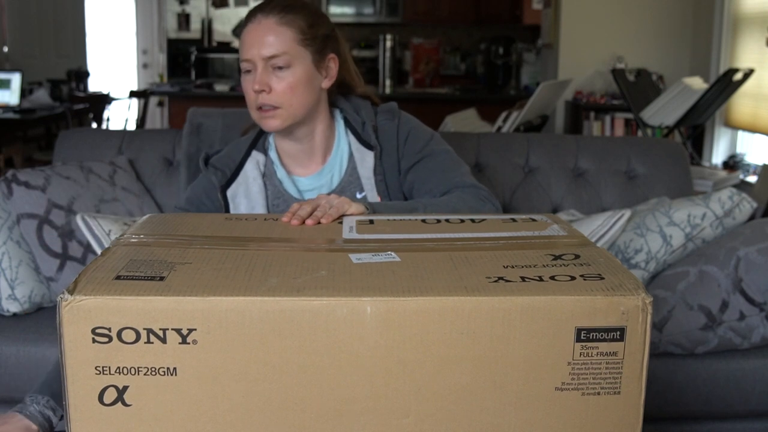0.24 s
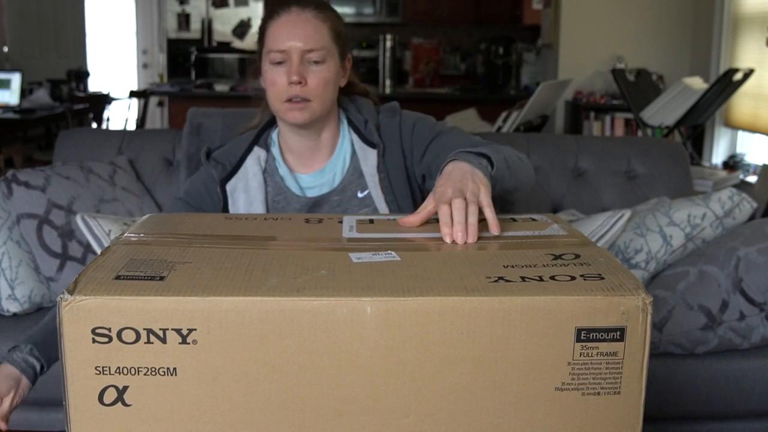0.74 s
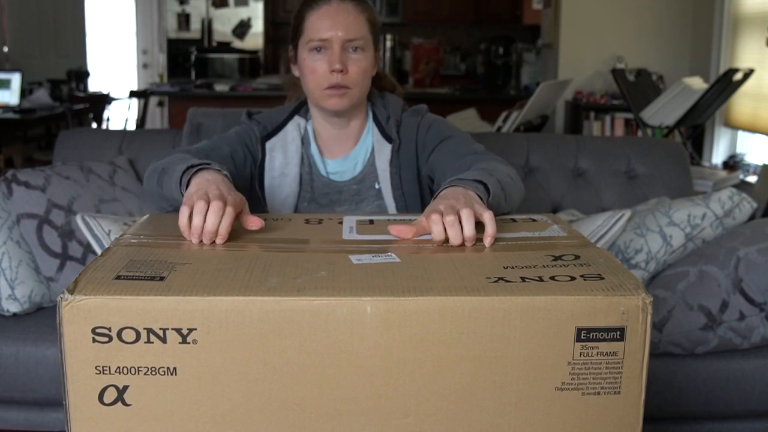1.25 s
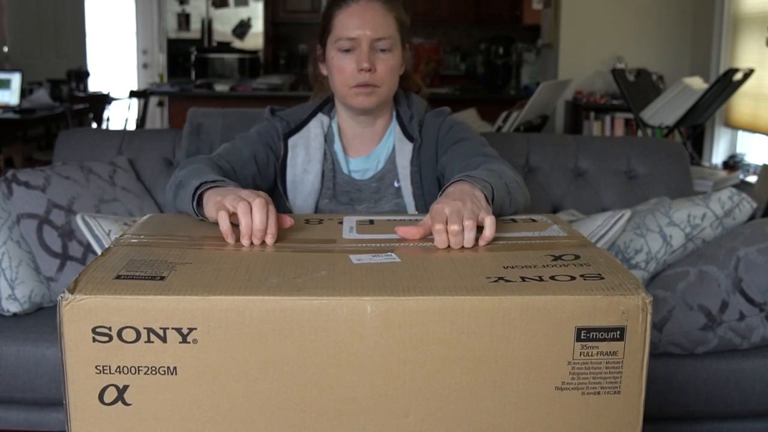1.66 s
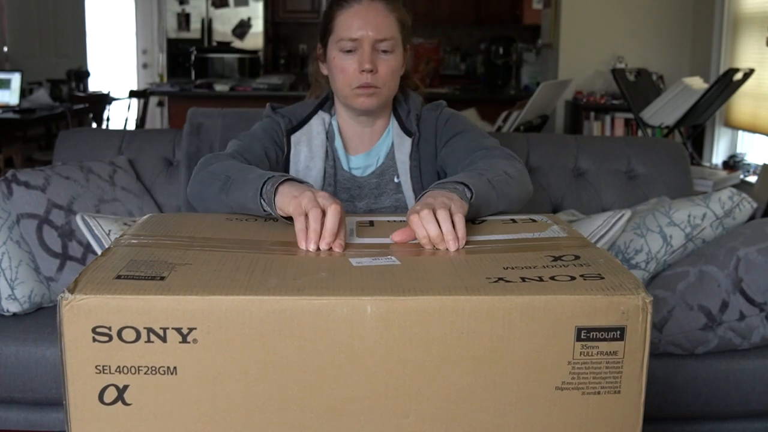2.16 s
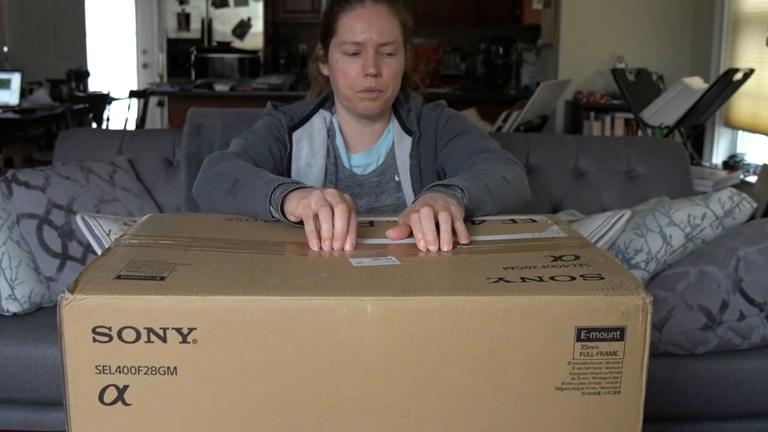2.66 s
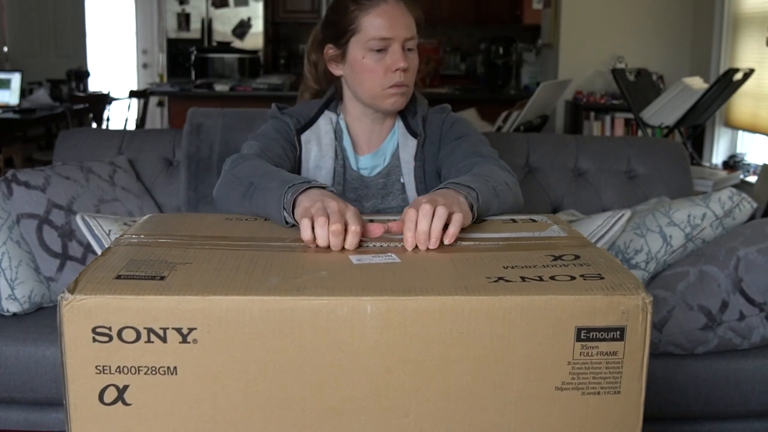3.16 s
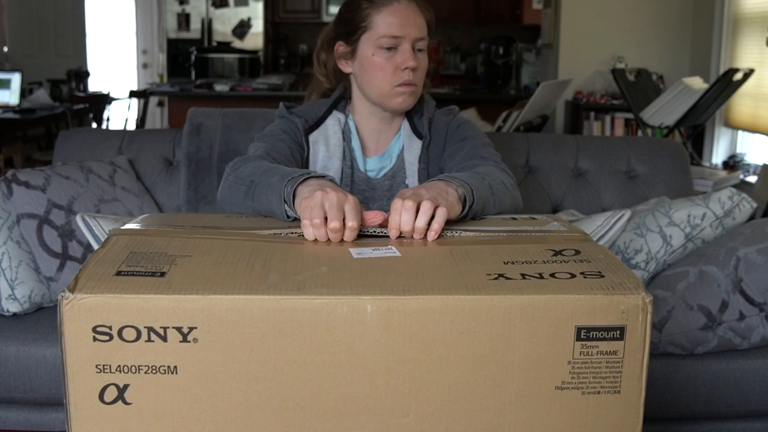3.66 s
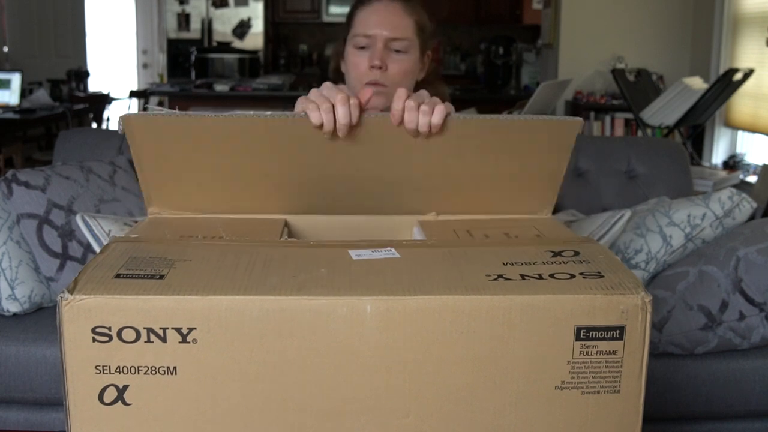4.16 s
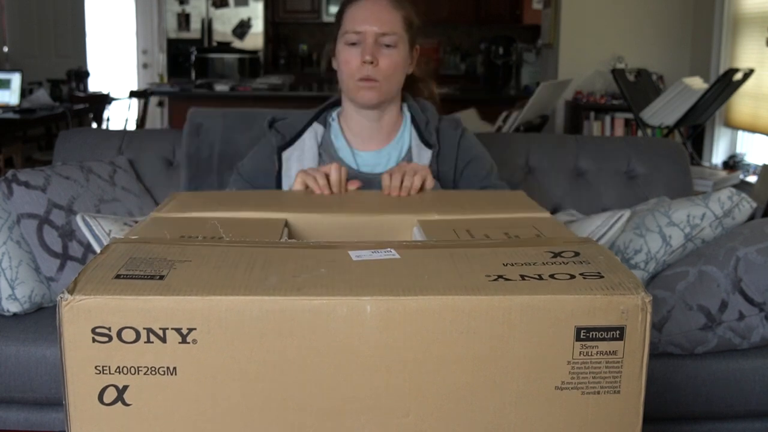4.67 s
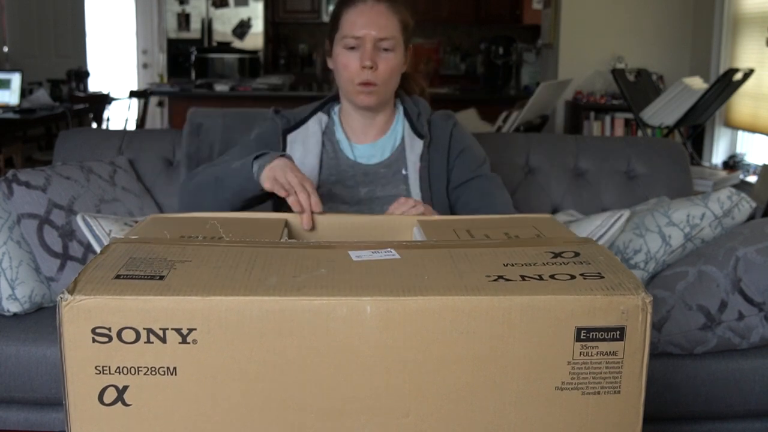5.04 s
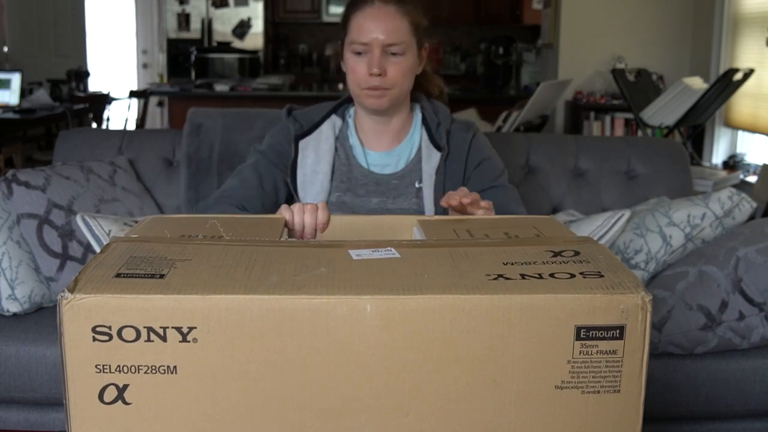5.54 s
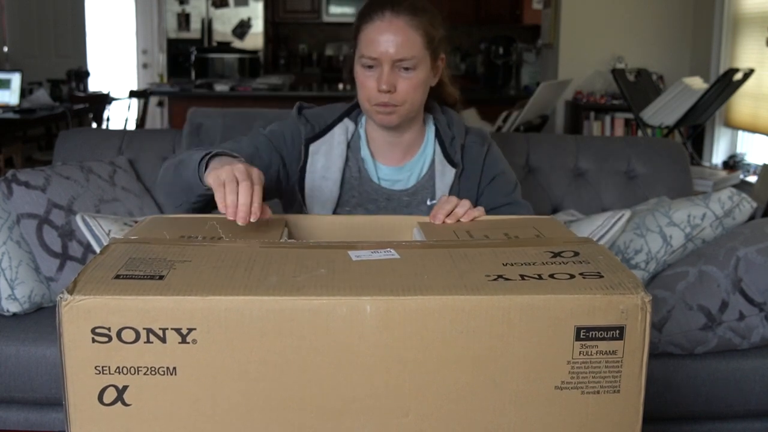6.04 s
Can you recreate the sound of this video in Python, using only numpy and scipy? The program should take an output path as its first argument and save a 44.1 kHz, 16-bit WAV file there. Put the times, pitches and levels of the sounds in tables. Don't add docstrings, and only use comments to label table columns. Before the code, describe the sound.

After a small hard tool clicks down, taped cardboard creaks and pops, rips loudly open, and settles into faint scuffs and rubbing.

```python
import sys
import numpy as np
from scipy import signal
from scipy.fft import rfft, irfft
from scipy.io import wavfile

SR = 44100
rng = np.random.default_rng(int(sys.argv[2]) if len(sys.argv) > 2 else 0)


def unload_wav(signal):
    wavfile.write(
        sys.argv[1],
        SR,
        np.round(np.clip(np.atleast_2d(signal).T, -1, 1) * 32767).astype(np.int16),
    )


def volts_from_decibels(level):
    exponent = np.asarray(level, float) / 20
    return 10 ** exponent


N = 278138

# (frequency [Hz], level [dB], T60 [s])
BOX_SOFT = [(192, -0.5, 0.091), (196, -8, 0.022), (234.3, -2.5, 0.14), (294, -14, 0.042), (301.7, 2, 0.072),
            (342.8, 0.5, 0.079), (396, -1.5, 0.063), (454, -1.5, 0.027)]
# (frequency [Hz], level [dB], T60 [s])
BOX_HARD = [(485, 1, 0.055), (576.4, 5, 0.036), (663, -3.5, 0.054), (728, -2.5, 0.091), (852, 4.5, 0.023),
            (957, -2.5, 0.062), (1124, -5, 0.025), (1420, -4, 0.028), (1609, -8.5, 0.06)]
# (time [s], peak [dB], hard part re peak [dB])
PRY_THUMPS = [(0.5614, -29, 11.5), (0.6629, -25, 3), (0.6676, -18.5, 7), (0.6858, -22, 11), (0.707, -32, 6),
              (0.7802, -40, 11), (0.85, -33, -1.5), (1.0001, -35.5, -9), (1.023, -35.5, -5),
              (1.101, -34.5, -3), (1.1592, -25.5, -8), (1.1804, -30.5, -26), (1.2486, -34, -2),
              (1.3374, -33, 1.5), (1.3453, -24, -5.5), (1.426, -27, -40), (1.5786, -31, -3.5),
              (2.916, -41, 3.5), (1.6588, -25, -1), (1.7337, -25, -5), (1.8377, -15.5, 2),
              (1.8864, -32, -2), (1.951, -24.5, -1.5), (2.0477, -33, -5), (2.1798, -26.5, -6),
              (2.36, -19, 1.5), (2.6284, -31, -5), (2.664, -22.5, -4), (2.685, -19.5, -8), (2.726, -33, 5),
              (0.958, -40.5, -12)]
# (time [s], peak [dB], hard part re peak [dB])
PULL_THUMPS = [(3.037, -28, -2), (3.053, -30.5, 4.5), (3.0951, -22, -3.5), (3.186, -21, -9),
               (3.3482, -37, 3.5), (3.4742, -35, 8.5), (3.555, -35, 1.5), (3.6399, -31.5, 0.5),
               (3.6866, -30.5, 13), (3.7384, -27.5, 2), (3.7547, -37, 11.5), (3.814, -13.5, -3),
               (3.8697, -12, -1), (3.8923, -23.5, 6), (3.937, -17.5, -2.5), (4.593, -43, -32),
               (4.0721, -5, -2), (4.0887, -11.5, 0.5), (4.114, -14.5, -4.5), (4.1285, -34, -4),
               (4.184, -45, 17), (4.8858, -34.5, -7), (5.6983, -35.5, -11), (5.716, -43, -10),
               (5.846, -42, -1), (6.007, -41.5, -7), (4.0625, -22, 3), (6.258, -40, -3), (5.821, -50, 2),
               (5.914, -48.5, 2), (5.934, -47.5, 0), (6.069, -43, -3.5), (6.1, -42, -3), (5.012, -43, 2),
               (4.075, -16, -3)]
# (start [s], end [s])
PEELING_S = (1.08, 4.3)


def at_hz(points, hz):
    point_hz, value = np.array(points).T
    return np.interp(np.log(hz + 1), np.log(point_hz), value)


def rms_one(x):
    return x / np.sqrt(np.mean(x ** 2) + 1e-20)


def band(x, low_hz, high_hz):
    edges_hz = [low_hz, min(high_hz, 0.45 * SR)]
    return signal.sosfilt(signal.butter(2, edges_hz, "band", fs=SR, output="sos"), x + 1e-18)


def drift(rate_hz):
    step = 40
    settle = 2000
    r = np.exp(-2 * np.pi * rate_hz * step / SR)
    white = rng.standard_normal(N // step + settle + 2)
    slow = signal.lfilter([1], [1, -2 * r, r * r], white)[settle:]
    return np.interp(np.arange(N) / step, np.arange(len(slow)), rms_one(slow))


def coloured(spectrum):
    hz = np.fft.rfftfreq(N, 1 / SR)
    inside = (hz > spectrum[0][0]) & (hz < spectrum[-1][0])
    white = rfft(rng.standard_normal(N))
    return rms_one(irfft(white * volts_from_decibels(at_hz(spectrum, hz)) * inside, N))


def bursts(times, level_db, length_s):
    size = 160
    decay = np.exp(-np.arange(size) / (length_s * SR))
    shape = rng.standard_normal((len(times), size)) * decay
    shape /= np.sqrt(np.sum(shape ** 2, axis=1, keepdims=True))
    out = np.zeros(N + size)
    at = (np.asarray(times) * SR).astype(int)[:, None] + np.arange(size)
    np.add.at(out, at, shape * volts_from_decibels(level_db)[:, None])
    return out[:N]


def struck(times, level_db, modes, spread_db, contact_s):
    out = np.zeros(N)
    chance = rng.standard_normal((len(times), len(modes), 3))
    for k, (hz, mode_db, t60) in enumerate(modes):
        strength, sign, delay = chance[:, k].T
        at = ((times + contact_s * np.abs(delay)) * SR).astype(int)
        blow = volts_from_decibels(level_db + mode_db + spread_db * np.clip(strength, -2, 1))
        force = np.full(N, 1e-18)
        np.add.at(force, at, blow * np.sign(sign + 1))
        r, w = volts_from_decibels(-60 / (t60 * SR)), 2 * np.pi * hz / SR
        out += signal.lfilter([0, np.sin(w)], [1, -2 * r * np.cos(w), r * r], force)
    return out


def background():
    # (frequency [Hz], density [dB per Hz])
    floor = [(30, -7.5), (60, 4.5), (110, -8.5), (220, 1.5), (500, -16), (1000, -29), (2500, -26),
             (8000, -37.5), (16000, -49)]
    # (time [s], level [dB])
    sway_level = [(0, -59), (1, -59), (1.5, -50), (2.3, -52.5), (2.9, -44), (3.5, -59), (4.3, -48.5),
                  (4.8, -60.5), (5.25, -43.5), (5.6, -43.5), (5.95, -54.5), (6.12, -44), (6.31, -50)]
    t = np.arange(N) / SR
    drone_hz, drone_db, drone_end_s = 393, -64, 0.64
    drone = volts_from_decibels(drone_db + 1.0 * drift(7.3)) * np.sin(2 * np.pi * drone_hz * t)
    drone *= np.clip((drone_end_s - t) / 0.044, 0, 1)
    sway_s, sway_db = np.transpose(sway_level)
    sway_hz = 18.5 + 1.2 * drift(2)
    sway = volts_from_decibels(np.interp(t, sway_s, sway_db) - 1.0) * np.sin(2 * np.pi * np.cumsum(sway_hz) / SR)
    return volts_from_decibels(-62) * coloured(floor) + drone + sway


def tool():
    # (time [s], peak [dB], low ring re peak [dB])
    taps = [
        (0.131, -64, 16),
        (0.1761, -34.5, -1),
        (0.182, -49, 0),
        (0.189, -50, -10),
        (.209, -46.5, 14),
        (0.295, -58, -3),
        (0.328, -56, 11),
        (0.382, -27.5, -9),
        (0.428, -52, -3),
        (.474, -60, 7),
    ]
    # (frequency [Hz], level [dB], T60 [s])
    high_modes = [(3400, 5, 0.0071), (3930, 6.5, 0.011), (4800, 3, 0.0094), (5430, 6.5, 0.0062),
                  (8060, 14, 0.0017), (9500, 14, 0.003), (11500, -19, 0.0016), (13200, 11.5, 0.0009)]
    # (frequency [Hz], level [dB], T60 [s])
    low_modes = [(740, -10.5, 0.031), (1800, -7, .015), (1940, -3, 0.026)]
    s, peak_db, low_db = np.transpose(taps)
    high = struck(s, peak_db - 11.5, high_modes, spread_db=8.5, contact_s=0.00054)
    low = struck(s, peak_db + low_db - 9.0, low_modes, spread_db=2.5, contact_s=0.000674)
    click = band(bursts(s, peak_db, length_s=0.0008), 2800, 13000)
    slide_start_s, slide_length_s, slide_db = 0.26, 0.048, -67.5
    slide_hz, rise_hz_per_s = 1810, 6000
    t = np.arange(N) / SR - slide_start_s
    swell = np.clip(np.minimum(t, slide_length_s - t) / 0.015, 0, 1) * volts_from_decibels(slide_db + 4 * drift(60))
    pitch_hz = slide_hz + rise_hz_per_s * t + 50 * drift(80)
    slide = swell * np.sin(2 * np.pi * np.cumsum(pitch_hz) / SR)
    return high + low + slide + click


def settling(times, level_db, fall_db_per_s):
    rise_s = 0.0006
    power = np.full(N, 1e-18)
    np.add.at(power, (times * SR).astype(int), volts_from_decibels(2 * level_db))
    rise = np.exp(-1 / (rise_s * SR))
    falling = signal.lfilter([1], [1, -volts_from_decibels(-2 * fall_db_per_s / SR)], power)
    return signal.lfilter([1 - rise], [1, -rise], falling)


def handling(snap_s, snap_db, snap_dull_db):
    # (start [s], hold [s], hiss [dB], weight on the board re hiss [dB])
    strokes = [(0.212, 0.05, -63, -13), (0.398, 0.068, -60.5, 1), (0.521, 0.0083, -54, -2),
               (0.785, 0.013, -50.5, 17.5), (0.993, 0.022, -56, -20), (1.127, 0.074, -63, 23.5),
               (1.23, 0.13, -60.5, 18.5), (1.599, 0.0089, -58.5, 18), (1.707, 0.046, -67, 24),
               (1.8, 0.027, -43.5, 11), (1.928, 0.071, -53.5, 11), (2.057, 0.11, -56, 11),
               (2.19, 0.006, -53, 16.5), (2.55, 0.12, -69, 21.5), (2.999, 0.037, -50, 8.5),
               (3.238, 0.074, -56, 16.5), (3.426, 0.15, -53, 11.5), (3.7, 0.25, -50.5, 17),
               (4.222, 0.15, -56.5, -3), (4.415, 0.35, -54.5, 2.5), (4.808, 0.067, -63, 14),
               (4.63, 0.064, -50.5, 0.5), (4.885, 0.1, -49, 6.5), (5.031, 0.075, -48.5, 4),
               (5.153, 0.11, -53.5, -1.5), (5.31, 0.13, -59, 3.5), (5.634, 0.16, -60, 13.5),
               (5.73, 0.21, -58, 2), (6.034, 0.043, -65, 16.5), (6.256, 0.047, -56, 7.5)]
    rise_db_per_s, fall_db_per_s = 398.5, 164.5
    rest_bright_db, rest_dull_db, rest_creak_db = -95.5, -80, -58
    grip_db = np.array([[-63], [-76]])
    t = np.arange(N) / SR
    jerk_s, jerk_db, hard_db = np.transpose(PRY_THUMPS + PULL_THUMPS)
    bright = volts_from_decibels(2 * rest_bright_db) + settling(snap_s, snap_db - 38, 157)
    dull = volts_from_decibels(2 * rest_dull_db) + settling(snap_s, snap_db + 0.81 * snap_dull_db - 22, 152)
    creak = volts_from_decibels(2 * rest_creak_db) + settling(jerk_s, jerk_db + 0.41 * hard_db - 14.5, 135.5)
    power = np.array([bright, dull, creak])
    power[:2] += volts_from_decibels(2 * grip_db) * (t > PEELING_S[0]) * (t < PEELING_S[1])
    for s, hold, db, weight_db in strokes:
        before_db = np.maximum(rise_db_per_s * (s - t), 0)
        after_db = np.maximum(fall_db_per_s * (t - s - hold), 0)
        stroke_db = db - np.minimum(before_db + after_db, 100)
        balance_db = np.array([[0], [-3 + 0.036 * weight_db], [weight_db]])
        power += volts_from_decibels(2 * stroke_db) * volts_from_decibels(2 * balance_db)
    return 10 * np.log10(power)


def rubbing(bright_db, dull_db, creak_db):
    # (frequency [Hz], density [dB per Hz])
    bright_spectrum = [(4800, -8), (6500, -1), (8500, -4), (11000, 0), (14000, -3), (16200, -5)]
    dull_spectrum = [(800, -5.5), (1100, 3), (1600, 0), (2500, -5.5), (4300, -3), (6200, -5),
                     (10000, -12.5)]
    creak_spectrum = [(90, -9), (230, 0), (420, -3), (800, -4), (1500, -20.5), (3500, -32)]
    flicker_db = 1.8 * drift(20)
    bright = volts_from_decibels(bright_db - 6.0 + flicker_db) * coloured(bright_spectrum)
    dull = volts_from_decibels(dull_db - 1.0 + flicker_db + 1.0 * drift(24)) * coloured(dull_spectrum)
    creak = volts_from_decibels(creak_db - 10.0 + 3.98 * drift(18)) * coloured(creak_spectrum)
    return bright + dull + creak


def rattle(creak_db):
    catches_per_s = 90
    s = np.sort(rng.uniform(0, N / SR - 0.02, int(catches_per_s * N / SR)))
    uneven_db = 4 * np.minimum(rng.exponential(1, len(s)), 1.8)
    level_db = creak_db[(s * SR).astype(int)] - 9.5 + uneven_db
    soft = struck(s, level_db, BOX_SOFT, spread_db=4.0, contact_s=0.002)
    hard = struck(s, level_db - 7.5, BOX_HARD, spread_db=6.5, contact_s=0.002)
    return band(soft + hard, 87, 3000)


def thumps():
    # (time [s], peak [dB])
    shifts = [(0.663, -48), (1.017, -47), (1.157, -48), (1.248, -48), (1.349, -49), (1.42, -53),
              (1.728, -56), (1.83, -39), (2.072, -44.5), (2.357, -51), (2.623, -58), (2.725, -45),
              (3.18, -55), (3.705, -57), (3.809, -31), (3.873, -38), (4.086, -24), (4.63, -52),
              (5.138, -53), (5.626, -45)]
    # (frequency [Hz], level [dB], T60 [s])
    boom_modes = [(62.1, 0.0021, 0.097), (75, 0, 0.16)]
    s, peak_db, hard_db = np.transpose(PRY_THUMPS + PULL_THUMPS)
    soft = band(struck(s, peak_db - 7.0, BOX_SOFT, spread_db=4.0, contact_s=0.00075), 200, 1500)
    hard = struck(s, peak_db + hard_db - 9.5, BOX_HARD, spread_db=4.5, contact_s=0.001383)
    slap = band(bursts(s, peak_db + hard_db + 10.0, length_s=0.00097), 1200, 3700)
    s, peak_db = np.transpose(shifts)
    boom = struck(s, peak_db + 3.5, boom_modes, spread_db=-3.0, contact_s=0.00066)
    return soft + band(hard, 490, 3900) + slap + band(boom, 46, 98)


def all_snaps():
    # (time [s], peak [dB], dull part re peak [dB])
    pry = [(0.562, -41, 23), (0.6679, -45, 27), (0.6863, -29, 15.5), (1.1023, -28.5, -11),
           (1.2269, -26, -16), (1.2366, -21.5, -27), (1.2576, -28.5, 2.5), (1.3746, -25.5, -14.5),
           (1.4265, -29, -16), (1.657, -19, -20), (1.6607, -12.5, -14), (1.7217, -26, -30),
           (1.7251, -15, -13), (1.7395, -26.5, -9), (1.797, -13.5, -15.5), (1.8225, -23.5, -18),
           (1.838, -9.5, -6.5), (1.9508, -27.5, -2.5), (2.013, -28.5, -31), (2.182, -26, 0),
           (2.1861, -14, -17), (2.3596, -9.5, -6.5), (2.3678, -9.5, -11.5), (2.3842, -19, -11),
           (2.6329, -34.5, -1.5), (2.6641, -30.5, -12), (2.6869, -29, -1), (2.729, -21, -4.5),
           (2.9182, -18.5, -14)]
    pull = [(3.0043, -24, -34), (3.036, -22, -3), (3.0402, -11.5, -13), (3.0918, -26, -17),
            (3.0958, -14, -20), (3.133, -22.5, -16), (3.186, -24.5, -1), (3.2344, -10, -20),
            (3.2466, -28.5, 4), (3.4755, -25, -9.5), (3.52, -11, -22), (3.5545, -9.5, -9.5),
            (3.559, -11.5, -14), (3.57, -33, 5), (3.5827, -18, -9.5), (3.5993, -20.5, -37),
            (3.704, -18.5, -8), (3.718, -14, -7.5), (3.7389, -4, -7), (3.7567, -14, -1), (3.763, -9, -25),
            (3.8047, -11.5, -13.5), (3.8212, -7, -2), (3.873, -7, 2), (3.9392, -15, -2),
            (4.0387, -15.5, -20), (4.063, -14.5, -12), (4.0735, -1.5, -3), (4.074, -1, 0.5),
            (4.2032, -27.5, 3), (4.2912, -27.5, -0.5)]
    pry_creep = [(1.1221, -37, -26), (1.1597, -43, -14), (1.1731, -35.5, -9), (1.176, -38.5, -3),
                 (1.183, -36, -15), (1.2496, -43, -6), (1.316, -34, -16), (1.3464, -31, -7),
                 (1.3516, -39, -12), (1.3601, -37, -22), (1.5797, -42, -5), (1.5857, -37.5, -22),
                 (1.59, -38, -4), (1.5934, -41, -7), (1.6126, -37, -22), (1.6906, -37, -22),
                 (1.7162, -30, -25), (1.748, -24.5, -27), (1.7711, -31, -22), (1.7857, -30.5, -15),
                 (1.8114, -26.5, -7), (1.8142, -36, -14), (1.8254, -23, -24), (1.9376, -28, -24),
                 (1.947, -35, -19), (1.9667, -26.5, -12), (1.9796, -38, -13), (1.9836, -40, -20),
                 (1.9902, -31.5, -13), (2.002, -34, -15), (2.0052, -26.5, -15), (2.025, -29.5, -27),
                 (2.0428, -36, -21), (2.0485, -34.5, -12), (2.0715, -39, -14), (2.1414, -33.5, -20),
                 (2.1483, -32, -31), (2.1633, -34.5, -18), (2.168, -32, -25), (2.2279, -45, -14),
                 (2.3984, -35, 1), (2.6381, -31, -11), (2.7014, -40, -15), (2.7124, -35, -23),
                 (2.909, -45, 0)]
    pull_creep = [(3.017, -32, -8), (3.02, -30, -25), (3.024, -35, -19), (3.0518, -27, -19),
                  (3.0626, -33, -12), (3.089, -30, -18), (3.105, -24, -3.5), (3.1249, -35.5, -20),
                  (3.1372, -24, -29), (3.1419, -36, -16), (3.1488, -33.5, -20), (3.1627, -29, -23),
                  (3.1672, -39, -22), (3.204, -36, -21), (3.2242, -30, -27), (3.24, -18.5, -9),
                  (3.2524, -28.5, -35), (3.2645, -33.5, -18), (3.2734, -36, -20.5), (3.286, -19.5, -31),
                  (3.289, -35, -18), (3.303, -25.5, -23), (3.3077, -26, -17.5), (3.3096, -23.5, -19),
                  (3.3134, -19.5, -10.5), (3.3203, -20, -10), (3.3226, -27, -24), (3.333, -26, -20),
                  (3.3445, -24.5, -19), (3.3484, -21, -28), (3.3562, -32.5, -19), (3.3596, -33, -16),
                  (3.3678, -25.5, -10), (3.378, -33.5, -16), (3.3983, -34, -33), (3.4089, -39.5, -13.5),
                  (3.4435, -32, -15), (3.448, -31.5, -16), (3.4515, -30, -25), (3.457, -31.5, -5),
                  (3.465, -40, -19), (3.4686, -21.5, -2.5), (3.478, -36, -6), (3.4827, -31.5, -15),
                  (3.4922, -34.5, -14.5), (3.4957, -36, -19.5), (3.5114, -30, -17), (3.514, -23.5, -18),
                  (3.5226, -20.5, -10), (3.55, -31, -17.5)]
    tear_creep = [(3.6416, -36, -14), (3.6532, -31, -27), (3.66, -34, -24), (3.664, -22.5, -14),
                  (3.6703, -30.5, -24), (3.6743, -20, -15.5), (3.6786, -32, -11.5), (3.6802, -28.5, -18),
                  (3.6877, -22.5, -6), (3.6956, -33, -11.5), (3.708, -16.5, -18.5), (3.7255, -27.5, -19),
                  (3.7373, -24, -20.5), (3.7413, -21, -5.5), (3.748, -19, -18), (3.753, -24, -20),
                  (3.7698, -26.5, -18.5), (3.7785, -32, -17), (3.808, -28.5, -14.5), (3.8166, -19.5, -12.5),
                  (3.8256, -14.5, 1.5), (3.8304, -18, -12), (3.838, -22.5, -10.5), (3.8432, -12.5, -14.5),
                  (3.854, -21, -10), (3.863, -13.5, -13.5), (3.8744, -9, 1), (3.879, -11.5, -15),
                  (3.898, -14.5, -13.5), (3.9475, -27, -17.5), (3.9597, -26.5, -14.5), (4.0362, -40, -15),
                  (4.0698, -17.5, -25), (4.0796, -16, -17), (4.089, -14, -2.5), (4.1433, -28, -1),
                  (4.1767, -30.5, -19), (4.1978, -31, 2), (4.208, -32.5, -6), (4.2131, -39, -9),
                  (4.2245, -37.5, -3.5), (4.244, -40.5, -6), (4.296, -27.5, -3.5), (4.2996, -36, -15),
                  (4.3053, -40.5, -14), (4.329, -33.5, -9)]
    return np.transpose(pry + pull + pry_creep + pull_creep + tear_creep)


def snaps(s, peak_db, dull_db):
    film_s, board_s = 0.00045, 0.0016
    crack = band(bursts(s, peak_db + 14.5, film_s), 5510, 9380)
    fizz = band(bursts(s, 0.99 * peak_db + 10.5, film_s), 6300, 16000)
    board = band(bursts(s, peak_db + dull_db + 20.0, board_s), 1100, 5300)
    return crack + fizz + board


def knocks():
    # (time [s], peak [dB], frequency [Hz], T60 [s])
    touches = [(5.511, -41, 175, .06), (5.642, -34, 170, .06), (5.70, -46, 85, .12), (4.636, -39, 275, .14),
               (4.69, -45, 270, .12), (4.886, -42, 950, .06), (0.688, -33, 1642, .12),
               (0.668, -15, 540, .04), (2.686, -15, 300, .03), (1.423, -32, 140, .08), (2.18, -44, 75, .12),
               (2.917, -44, 130, .08)]
    out, t = np.zeros(N + SR), np.arange(SR // 2) / SR
    for s, db, hz, t60 in touches:
        start = int(s * SR)
        out[start:start + len(t)] += volts_from_decibels(db - 60 * t / t60) * np.sin(2 * np.pi * hz * t)
    return out[:N]


def scuffs():
    # (time [s], half length [s], level [dB], centre frequency [Hz])
    drags = [(4.466, 0.021, -48.5, 4230), (4.685, 0.028, -46.5, 4500), (4.736, 0.029, -47, 5100),
             (4.895, 0.018, -50.5, 5400), (4.677, 0.033, -48, 11100), (5.08, 0.018, -50, 3132),
             (5.097, 0.021, -46, 5600), (0.82, 0.044, -53, 11000), (3.962, 0.014, -34.5, 4900),
             (4.7, 0.083, -59.5, 770), (4.955, 0.057, -54, 1000)]
    t, white = np.arange(N) / SR, rng.standard_normal(N)
    out = np.zeros(N)
    for s, half, db, hz in drags:
        swell = volts_from_decibels(db) * np.exp(-((t - s) / half) ** 2)
        out += swell * rms_one(band(white, hz / 1.3, hz * 1.3))
    return out


def ticks():
    # (time [s], peak [dB], centre frequency [Hz])
    contacts = [(4.883, -37, 1800), (4.7139, -30.5, 4600), (4.6366, -40, 6300), (5.0332, -37, 4200),
                (4.3946, -51, 1600), (.953, -54, 4000), (6.068, -52, 2200), (5.378, -50.5, 2510),
                (5.69, -41.5, 3820), (5.818, -38, 3300), (6.095, -43, 510), (1.4, -17, 630),
                (6.243, -43.5, 12000), (2.6645, -18, 4700)]
    out = np.zeros(N)
    for s, db, hz in contacts:
        out += band(bursts([s], np.array([db + 19.5]), length_s=0.0015), hz / 1.5, hz * 1.5)
    return out


def grains(per_s, low_hz):
    sizes = volts_from_decibels(4 * np.minimum(rng.exponential(1, N), 3.5)) * rng.choice([-1, 1], N)
    born = rng.random(N) < per_s / SR
    colour = rng.integers(0, 5, N)
    out = np.zeros(N)
    for k, hz in enumerate(np.geomspace(low_hz, 12000, 5)):
        out += band(sizes * born * (colour == k), hz / 2.2, hz * 1.2)
    return rms_one(out)


def crackle(bright_db):
    # (start [s], length [s], level [dB])
    rips = [
        (1.824, 0.021, -44),
        (3.305, 0.06, -41.5),
        (3.666, 0.018, -30.5),
        (3.76, 0.016, -36.5),
        (3.799, 0.04, -25.5),
        (3.864, 0.03, -17),
        (4.057, 0.021, -27.5),
    ]
    t = np.arange(N) / SR
    tearing = np.zeros(N)
    for s, length, db in rips:
        tearing += volts_from_decibels(db) * np.clip(np.minimum(t - s, s + length - t) / 0.013, 0, 1)
    clumps_per_s = 900 * volts_from_decibels(8 * drift(30))
    strained = (t > PEELING_S[0]) & (t < PEELING_S[1])
    peeling = volts_from_decibels(bright_db - 3.5) * grains(clumps_per_s, low_hz=4020) * strained
    return peeling + tearing * grains(4000, low_hz=2070)


def room(x):
    # (frequency [Hz], T60 [s])
    reverberation = [(60, 0.12), (250, 0.3), (1000, 0.32), (4000, 0.25), (9000, 0.14)]
    gap_s = 0.00053
    t = np.arange(SR // 2) / SR
    white, tail = rng.standard_normal(len(t)), np.zeros(len(t))
    for hz in 62.5 * 2.0 ** np.arange(8):
        octave = band(white, hz / np.sqrt(2), hz * np.sqrt(2))
        tail += octave * volts_from_decibels(-60 * t / at_hz(reverberation, hz))
    tail *= np.clip(t / gap_s, 0, 1) ** 2
    return signal.fftconvolve(x, tail / np.sqrt(np.sum(tail ** 2)))[:N]


def capsule(x):
    # (frequency [Hz], width [Hz], gain [dB])
    colour = [(8400, 1800, 5), (10000, 1800, -6), (13200, 2500, 2)]
    for hz, width, gain_db in colour:
        w, a = 2 * np.pi * hz / SR, volts_from_decibels(gain_db / 2)
        k = np.sin(w) * width / hz / 2
        middle = -2 * np.cos(w)
        x = signal.lfilter([1 + k * a, middle, 1 - k * a], [1 + k / a, middle, 1 - k / a], x)
    return signal.sosfilt(signal.butter(1, 9000, fs=SR, output="sos"), x)


def scene():
    lettings_go = all_snaps()
    bright_db, dull_db, creak_db = handling(*lettings_go)
    far = tool()
    box = rattle(creak_db - 10) + thumps() + snaps(*lettings_go) + knocks()
    box += scuffs() + ticks() + crackle(bright_db)
    echoes = volts_from_decibels(-14) * room(box + volts_from_decibels(6.5) * far)
    rubs = rubbing(bright_db, dull_db, creak_db)
    return (capsule(box + far + echoes + rubs) + background())[None]


def band_limit(x):
    return signal.sosfilt(signal.butter(12, 16000, fs=SR, output="sos"), x)


def record(dry):
    top = signal.cheby2(18, 60, 16500, fs=SR, output="sos")
    mix = signal.sosfilt(top, np.clip(dry, -1, 1))
    return band_limit(mix)


dry = scene()
out = record(dry)
unload_wav(out)
```